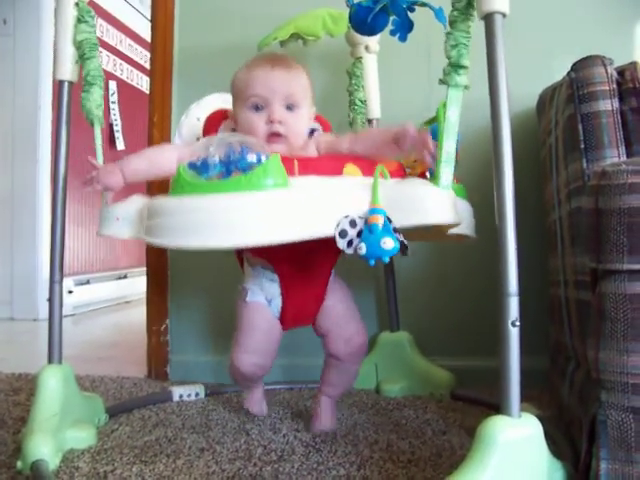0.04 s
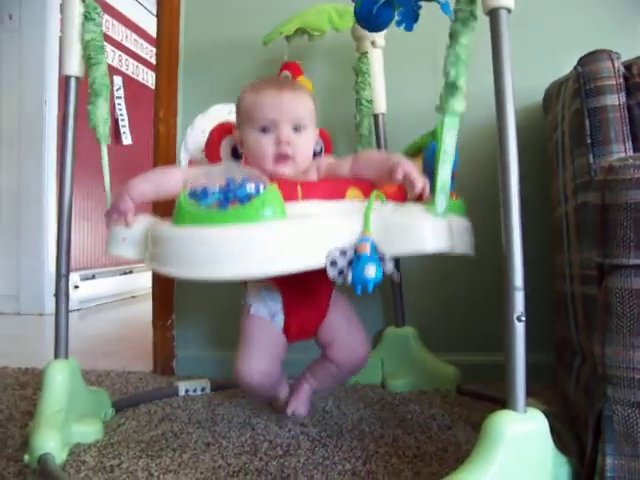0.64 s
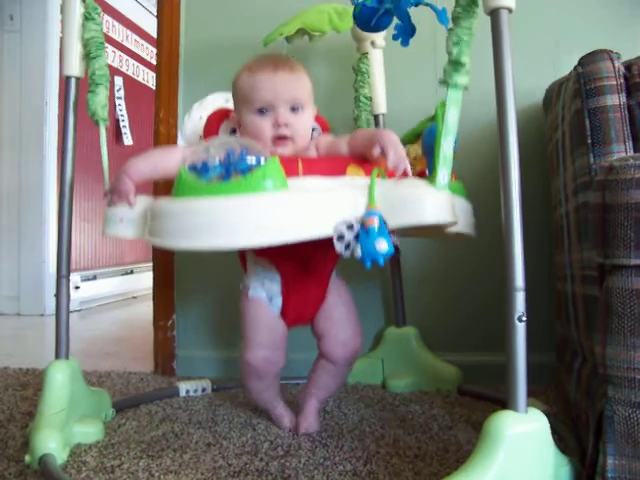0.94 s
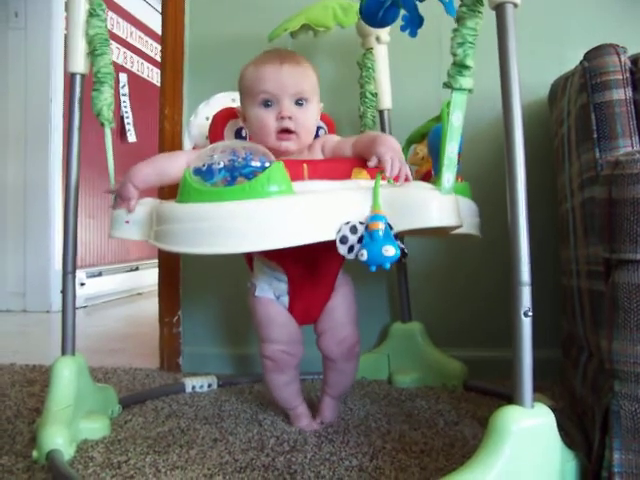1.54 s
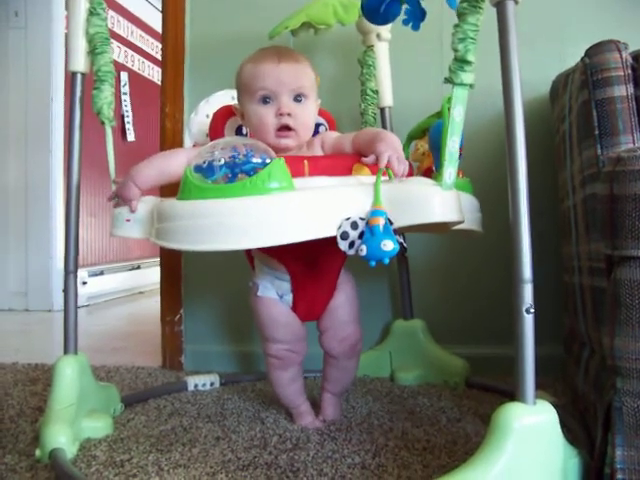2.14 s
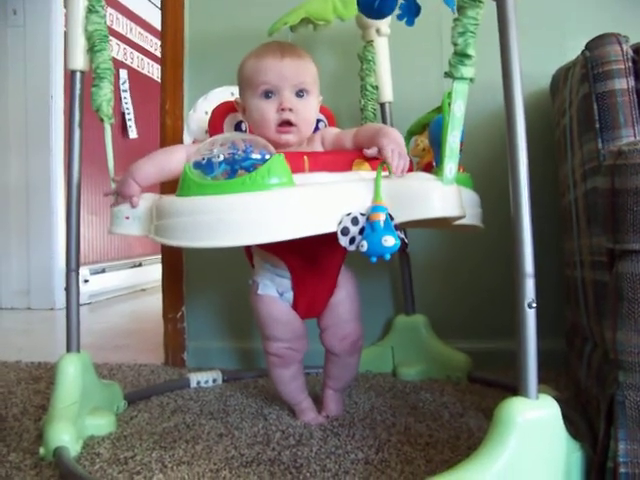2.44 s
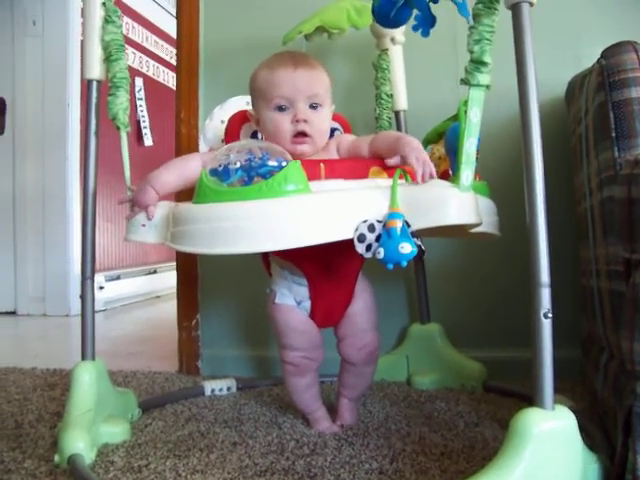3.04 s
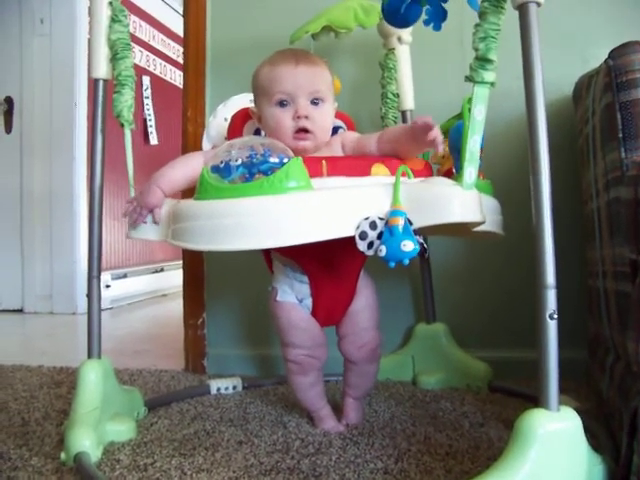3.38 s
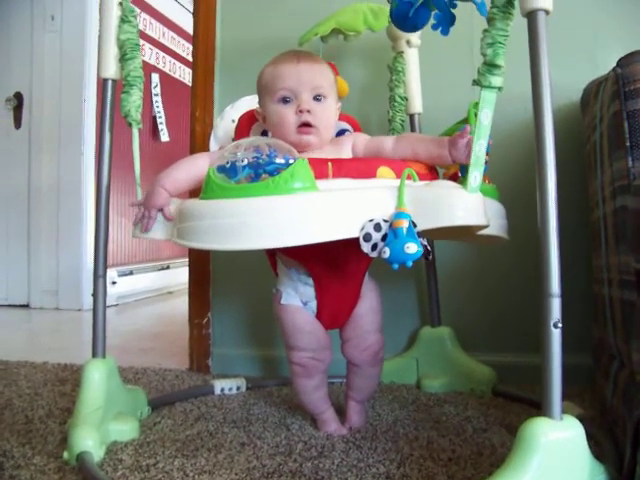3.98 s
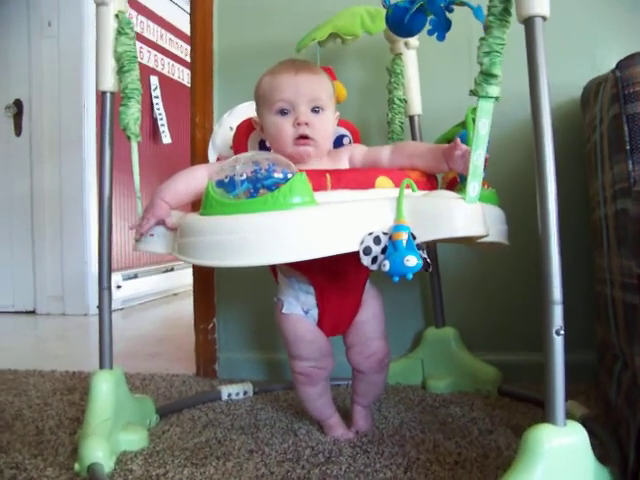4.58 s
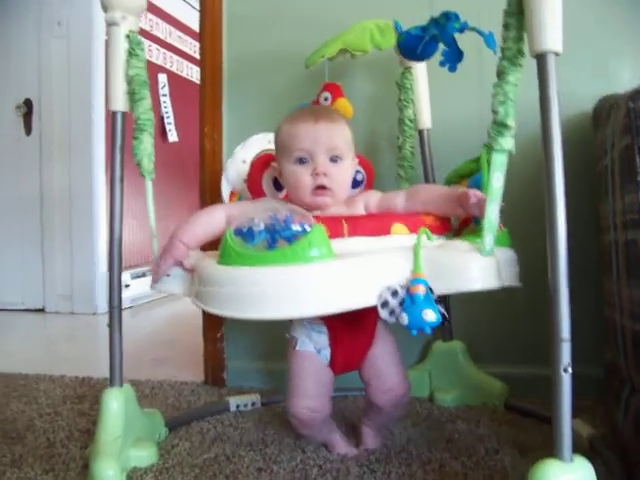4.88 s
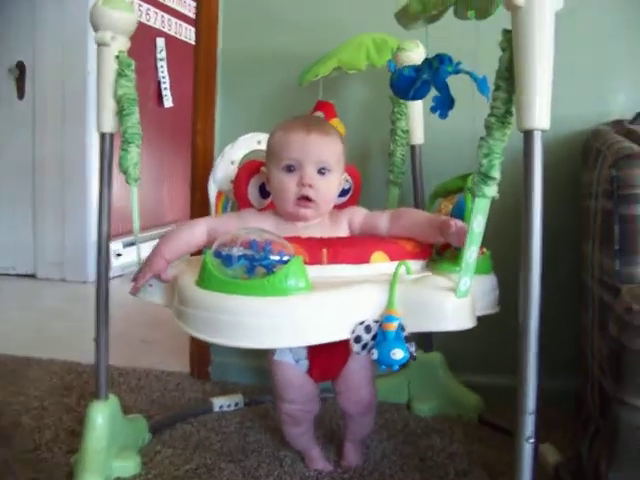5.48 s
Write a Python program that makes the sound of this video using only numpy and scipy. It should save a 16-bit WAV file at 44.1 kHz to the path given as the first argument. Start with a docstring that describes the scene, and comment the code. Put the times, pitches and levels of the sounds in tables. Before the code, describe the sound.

Close by, beads clatter in a plastic dome and toys knock and scrape on the tray of a baby jumper, with sharp snaps and low thumps. After about a second the beads only slide back and forth, ever softer. Quiet cloth rubs follow, then small creaks and a few more clacks. A faint electrical hum and hiss lie under everything in the carpeted room.

```python
"""Baby in a spring jumper

A baby bounces in a carpeted living room, rests while the tray rocks itself out, then stirs again.
Plastic beads tumble and clack in a clear dome on the tray. Hanging toys knock and scrape on the hollow
tray, the frame creaks and thuds, and the fabric seat and spring sleeves rustle.
Underneath sits a bed of mains hum and soft hiss."""
import sys
import numpy as np
from scipy import signal
from scipy.fft import rfft, irfft
from scipy.io import wavfile
from scipy.ndimage import uniform_filter1d

SR = 44100
rng = np.random.default_rng(int(sys.argv[2]) if len(sys.argv) > 2 else 0)


def generate_wav(signal):
    """Clip the signal to [-1, 1] and save it as 16-bit WAV at the path in sys.argv[1]."""
    frames = np.transpose(np.atleast_2d(signal))
    scaled = np.clip(frames, -1, 1) * 32767
    pcm = np.round(scaled).astype(np.int16)
    wavfile.write(sys.argv[1], SR, pcm)


N = 247842
TIME = np.arange(N) / SR

# the heap tumbles at a bounce, or rolls faintly as the tray rocks: t/s, length/s, level/dB
HEAP_TUMBLES = [(0, .15, -26.5), (.197, 0.0085, -20.5), (.256, 0.0077, -20.5), (.295, 0.13, -26.5),
                (.405, 0.19, -30.5), (.628, 0.086, -30.5), (.69, .048, -21.5), (.75, 0.062, -27),
                (.866, 0.14, -24.5), (.928, 0.036, -18.5), (.975, 0.047, -27), (1.115, 0.066, -27),
                (2.27, 0.039, -45), (2.765, 0.056, -54), (2.92, 0.184, -50.5), (5.45, 0.084, -36.5)]
# ring of the dome: f/Hz, t60/s, level/dB
DOME_RING = [(2340, 0.024, -27.5), (2410, 0.055, -19), (2740, 0.063, -24), (3355, 0.01, -18),
             (3700, 0.027, -32.5), (4134, 0.032, -21.5), (4810, 0.044, -26), (5050, 0.036, -22.5),
             (6714, 0.01, -18)]
# tone of the dome: f/Hz, level/dB, left minus right/dB
DOME_EQ = [(300, -41, 4), (1000, -32.5, -0.5), (1920, -33, -4), (2295, 1.5, -3), (2690, -3.5, -5.5),
           (3300, -3, 6), (4080, 2, 3), (5210, -0.5, -1.5), (6160, -5, -1), (6840, -2.5, -8),
           (7610, -11.5, -7), (7980, -30.5, -15.5), (8440, -22, 2), (8880, -46, -12)]
# the dome swings with the tray, panned at half this depth: t/s, left minus right/dB
DOME_SWING = [(0.0, -9), (0.2, 11), (0.34, -3.5), (0.6, 0), (0.77, -2.5), (1.05, 3), (1.38, 1), (2.1, 4)]
SETTLE_S, ROLL_S = 0.0022, 0.039  # time constants: the heap comes to rest, stray beads roll on


def beads():
    """Clacks and a patter of small collisions ring the dome, which is thin below its first mode."""
    hits = clacks()
    motion = linger(spells(*np.transpose(list(HEAP_TUMBLES) + slides())), SETTLE_S)
    collisions = patter(motion, rate=750, scatter_db=4.5)
    heap = shell(collisions, t60=0.011, tick=0.28, likeness=0.65, size=1024)
    strays = patter(undb(2 * -10.5) * linger(motion, ROLL_S), rate=1400, scatter_db=6.5)
    rolling = shell(strays, t60=0.0053, tick=0.32, likeness=0.78, size=1024)
    rolling = signal.sosfilt(butter(1, 4500), rolling)  # gentle contacts are duller than blows
    dome = ring(undb(-1) * hits + undb(-6.5) * heap + rolling, DOME_RING)
    # each band leaves the curved shell in its own direction
    hz, dome_db, side_db = np.transpose(DOME_EQ)
    ears = [colour(np.transpose([hz, dome_db + side * side_db / 2])) for side in (1, -1)]
    return pan(convolve(dome, ears), .5 * curve(DOME_SWING))


# a bead hits the dome and bounces: t/s, level/dB, first gap/s, loss per bounce/dB, hardness/dB
BEAD_HITS = [(.065, -16, 0.012, 10, 7), (.125, -18, .015, 1, 9), (.282, -14.5, 0.0068, 4, 10),
             (.32, -13.5, .008, 4, 11), (0.357, -16, 0.0053, 16, 6), (.367, -6.5, .002, 9, -5),
             (.403, -7, 0.018, 16, 18), (.443, -11, .018, 2.5, 13), (.689, -12, .015, 0.5, 4),
             (.794, -13.5, .013, 3.5, 4), (.97, -9, .021, 3, 15), (1.033, -5, 0.0032, 13, 8.5),
             (1.067, -11.5, 0.018, 1.5, 8.5), (1.173, -18, 0.0067, 0, 15), (1.221, -13.5, 0.012, 1.3, 0),
             (1.326, -22.5, 0.0037, 2, -6.5), (1.393, -20.5, .021, 3, -0.5), (1.49, -21, 0.0046, 3, -10),
             (1.82, -29, 0.021, 2.5, -20), (1.887, -25.5, 0.0094, 5, 1), (1.996, -26.5, 0.0067, .5, 3.5),
             (2.059, -34, .006, 12, -5), (2.147, -25, 0.0053, 14, 0), (2.315, -32.5, .004, 11, -15),
             (2.379, -29.5, 0.015, 6, 1), (2.48, -38, .009, 2, -7), (2.789, -38, .012, 2.5, -11),
             (3.3, -30.5, 0.0032, 9, 9), (5.375, -19, .003, 10, 6), (5.401, -22, 0.0086, 2.5, 1),
             (5.535, -22, 0.0036, 2, 2), (5.588, -23.5, .005, 6, -6)]
RESTITUTION = .68  # each gap between bounces as a share of the one before


def clacks():
    """Single beads bounce ever faster; hard contacts favour the treble, soft ones the low modes."""
    bounces = sorted((start + gap * np.sum(RESTITUTION ** np.arange(k)), db - k * loss_db, hardness)
                     for start, db, gap, loss_db, hardness in BEAD_HITS for k in range(5))
    times, db, hardness_db = np.transpose(bounces)
    strikes = shell(blows(times, db), t60=.015, tick=.25, likeness=.7, size=2048)
    treble_share = 1 / (1 + undb(-2 * (hardness_db + 2.5)))
    share = treble_share[np.searchsorted(times, TIME + 1 / SR) - 1]  # held from clack to clack
    lows = signal.sosfiltfilt(butter(2, 4200), strikes)
    return np.sqrt(2 * (1 - share)) * lows + np.sqrt(2 * share) * (strikes - lows)


# left alone, the tray rocks itself out on its springs: start/s, end/s, level/dB, fade/(dB per s)
TRAY_ROCKING = [(1.165, 3.2, -28, 12.5), (5.375, 5.62, -30.5, 8)]
SWING_S = .1632  # half a rocking cycle
SLIDE_S, SLIDE_SHRINK_S = 0.057, 0.85  # length of the first slide, time constant of its shortening
REBOUND_S, REBOUND_DB = 0.055, -2.5  # the heap falls back from the wall of the dome


def slides():
    """Each swing slides the heap across and back, ever shorter and softer: t/s, length/s, level/dB."""
    rows = []
    for start, end, first_db, fade_db_per_s in TRAY_ROCKING:
        for age in np.arange(0, end - start, SWING_S):
            length = SLIDE_S * np.exp(-age / SLIDE_SHRINK_S)
            db = first_db - fade_db_per_s * age
            rows += [(start + age, length, db), (start + age + REBOUND_S, length, db + REBOUND_DB)]
    return rows


# knocks on tray and frame: t/s, hollow body/dB, hard crack/dB
TRAY_KNOCKS = [(.036, -15, -19), (.088, -8, -7), (.16, -10, -16.5), (.207, -13.5, -11), (.283, -16, -26),
               (.405, -18.5, -19.5), (.522, -17, -31), (.556, -21, -19), (.748, -15, -12.5),
               (.809, -23.5, -25.5), (.896, -16, -18), (.95, -23, -26), (1.38, -35, -48), (1.524, -24, -24),
               (3.587, -32, -27.5), (5.323, -30.5, -19), (5.537, -33, -28)]
# toys drag along the tray: t/s, length/s, hollow body/dB, hard crack/dB
TOY_SCRAPES = [(0, 0.028, -27.5, -23.5), (0.038, .018, -20.5, -18.5), (.308, 0.015, -29, -31.5),
               (.492, .075, -26, -26), (0.565, 0.047, -32.5, -37), (0.851, 0.011, -24.5, -36)]
# ring of the tray: f/Hz, t60/s, level/dB
TRAY_RING = [(494, 0.063, -14.5), (529, 0.049, -15), (650, 0.018, -8), (731, 0.04, -11), (888, 0.017, -9),
             (1065, 0.019, -9.5), (1090, 0.023, -19.5), (1433, 0.016, -20.5)]
# boxy tone of the tray: f/Hz, level/dB
BODY_EQ = [(100, -22), (310, -29), (400, -17), (520, -2.5), (1100, -2), (1400, 7), (2200, 1), (3500, -18),
           (8000, -44)]
# bright attack of a hard contact: f/Hz, level/dB
CRACK_EQ = [(200, -36), (700, -18.5), (1400, 6), (2600, 6.5), (4200, 5), (5500, 4.5), (7000, -0.5),
            (8000, -23.5), (9000, -52)]
CHATTER_S, CHATTER_DB = 0.025, -7  # a toy chatters on after its knock: time constant, send level


def tray():
    """Knocks, creaks and scrapes sound the hollow tray; hard contacts add a bright crack."""
    times, body_db, crack_db = np.transpose(TRAY_KNOCKS)
    starts, lengths, rub_body_db, rub_crack_db = np.transpose(list(TOY_SCRAPES) + creaks())
    chatter = patter(1, rate=800, scatter_db=3)

    def contacts(knock_db, rub_db):
        """The blows, and the chatter that follows them or comes with a scrape."""
        hits = blows(times, knock_db)
        power = spells(starts, lengths, rub_db) + undb(2 * CHATTER_DB) * linger(hits ** 2, CHATTER_S)
        return hits + undb(-1) * chatter * np.sqrt(power)

    body = shell(undb(-6.5) * contacts(body_db, rub_body_db), t60=.036, tick=.55, likeness=.93)
    crack = shell(undb(-2) * contacts(crack_db, rub_crack_db), t60=.016, tick=.4, likeness=.5)
    hollow = convolve(ring(body, TRAY_RING), colour(BODY_EQ))
    bright = convolve(crack, colour(CRACK_EQ))
    return pan(hollow, db=-2) + pan(bright, db=0.5)


# the frame creaks under a shifting load: t/s, length/s, gap between slips/s, level/dB
FRAME_CREAKS = [(4.782, .058, 0.03, -35.5), (4.894, .045, .0165, -29), (4.947, .03, .019, -35),
                (5.021, .033, .021, -30.5), (5.216, .06, 0.0171, -31.5)]
SLIP_S, SLIP_BODY_DB = 0.0056, -7  # length of one slip, its send to the hollow body


def creaks():
    """A creak is a run of brief slips, some dull, some bright: t/s, length/s, body/dB, crack/dB."""
    slips = [(start + age, db) for start, length, gap, db in FRAME_CREAKS
             for age in np.arange(0, length, gap)]
    tilts_db = rng.uniform(-1.1, 1, len(slips))
    return [(time, SLIP_S, db + SLIP_BODY_DB + tilt, db - tilt / 2)
            for (time, db), tilt in zip(slips, tilts_db)]


# sharp snaps of a loose plastic part: t/s, level/dB
PART_SNAPS = [(0.0917, -1), (0.0958, -11.5), (0.5363, -1.5), (.5395, -0.5)]
# their biting tone: f/Hz, level/dB
SNAP_EQ = [(400, -25.5), (1800, -14.5), (2500, -3), (3200, 9), (3900, -8.5), (4400, 0), (5700, -13.5),
           (6700, -1), (8000, -25), (9000, -57)]


def snaps():
    """A small stiff part slaps against its stop."""
    slap = shell(blows(*np.transpose(PART_SNAPS)), t60=0.01, tick=0.46, likeness=0.4)
    return pan(undb(-4.5) * convolve(slap, colour(SNAP_EQ)), db=1.5)


# the rustle rides on how hard the baby works the seat: t/s, level/dB
SEAT_EFFORT = [(0, -37.5), (.9, -42.5), (1.2, -50), (2.5, -56), (4.55, -53), (4.78, -42), (5.1, -43.5),
               (5.3, -41), (5.62, -45)]
# single soft rubs: centre/s, half width/s, level/dB
FABRIC_RUBS = [(2.61, 0.048, -48.5), (3.45, 0.093, -50.5), (3.78, 0.12, -53.5), (4.12, 0.064, -48.5),
               (4.42, 0.095, -47)]
# tone of the cloth: f/Hz, level/dB
FABRIC_EQ = [(120, -17), (230, 1), (310, -15.5), (400, -0.5), (600, -0.5), (1050, 2), (1800, -0.5),
             (2800, 2.5), (4200, 0.5), (5500, -2.5), (7000, -4), (8000, -22.5), (9000, -45.5)]


def fabric():
    """Threads of the seat and the spring sleeves slip over each other."""
    rubs = sum(undb(2 * db) * np.exp(-((TIME - mid) / width) ** 2) for mid, width, db in FABRIC_RUBS)
    snags = patter(undb(2 * curve(SEAT_EFFORT)) + rubs, rate=2200, scatter_db=3)
    threads = shell(snags, t60=.018, tick=.15, likeness=.35, size=1024, count=200)
    return pan(convolve(threads, colour(FABRIC_EQ)), db=-2.5)


# low thumps at the bottom of a bounce: t/s, level/dB
FRAME_THUDS = [(0.038, -35.5), (0.202, -29.5), (0.523, -38.5)]


def thuds():
    """Dull shocks of the frame on the carpet."""
    shock = shell(blows(*np.transpose(FRAME_THUDS)), t60=0.36, tick=.05, likeness=0.94, size=16384)
    return convolve(shock, colour([(20, -11.5), (42, 15), (90, 0), (200, -5), (400, -14), (2000, -70)]))


# room tone: f/Hz, level/dB
AIR_EQ = [(15, -19.5), (25, -5.5), (140, -2), (300, -10.5), (479, 1.5), (659, 2.5), (843, 0), (953, -5.5),
          (2430, -5), (2610, -14), (2960, -11), (3510, -12.5), (3870, -15), (6180, -10), (8940, -39.5),
          (11600, -88), (19700, -120)]
# partials of the hum: f/Hz, level/dB
HUM_TONES = [(59.5, -70), (119.3, -61.5), (167, -68)]


def background():
    """Soft room air with a faint whirr, wide hiss on top and a mains hum that wavers slightly."""
    air = signal.sosfilt(butter(2, 1100), convolve(stereo_noise(0.89), colour(AIR_EQ)))
    hiss = signal.sosfilt(butter(2, 1100, "high"), convolve(stereo_noise(0.14), colour(AIR_EQ)))
    bed = pan(air, db=-1) + pan(hiss, db=-0.5)
    whirr_tone = colour([(250, -40.5), (480, -6.5), (600, 21), (720, 11), (900, -2.5), (1500, -53)])
    whirr = convolve(stereo_noise(0.95), whirr_tone)
    waver_s = 0.0024 * np.cumsum(rng.standard_normal(N)) / np.sqrt(SR)
    hum = sum(undb(db) * np.sqrt(2) * np.sin(2 * np.pi * hz * (TIME + waver_s)) for hz, db in HUM_TONES)
    return undb(-53) * bed + pan(undb(-62) * whirr + hum, db=-4)


def room(x, t60, wet_db):
    """Walls answer after some milliseconds; carpet and sofa keep the tail short."""
    arrived = TIME[:SR // 2] > .006
    tail = stereo_noise(0.92)[:, :SR // 2] * arrived * fade(t60)
    return x + undb(wet_db) * convolve(x, tail)


def shell(impacts, t60, tick, likeness, size=4096, count=24):
    """Each of `count` contact points gives a clean tick (its energy share), then a blur of modes."""
    noise = rng.standard_normal((count, 3, size))
    blur = (np.sqrt(likeness) * noise[:, :1] + np.sqrt(1 - likeness) * noise[:, 1:]) * fade(t60)[:size]
    spectra = np.sqrt(tick) + np.sqrt(1 - tick) * rfft(blur)
    # the points differ in their fine resonances, but are equally loud overall
    span = int(30 / t60 * size / SR)
    points = irfft(spectra / np.sqrt(uniform_filter1d(np.abs(spectra) ** 2, span)))
    struck = rng.integers(count, size=N)
    out = np.zeros((2, N + size))
    for i in np.flatnonzero(impacts):
        out[:, i:i + size] += impacts[i] * points[struck[i]]
    return out[:, :N]


def ring(x, modes):
    """Add the few modes that outlast the blur, in mono."""
    t = TIME[:SR // 2]
    response = sum(undb(db) * np.sqrt(2) * fade(t60) * np.sin(2 * np.pi * hz * t)
                   for hz, t60, db in modes)
    return x + convolve(x.mean(axis=0), response)


def blows(times, db):
    """One impulse per blow; its level is that of its energy spread over a millisecond."""
    out = np.zeros(N)
    samples = np.clip(np.asarray(times) * SR, 0, N - 1).astype(int)
    np.add.at(out, samples, undb(db) * np.sqrt(SR / 1000))
    return out


def patter(power, rate, scatter_db):
    """Random uneven impacts, `rate` a second, share out the power of a motion."""
    sizes = (rng.random(N) < rate / SR) * undb(scatter_db * np.clip(rng.standard_normal(N), -2, 2))
    sizes *= rng.choice([-1, 1], N)
    local_power = uniform_filter1d(sizes ** 2, size=900) + np.mean(sizes ** 2) / 10
    return sizes * np.sqrt(power / local_power)


def spells(starts, lengths, levels_db):
    """Power envelope of short spells of motion, with quick ramps at the edges."""
    return sum(undb(2 * db) * np.clip(np.minimum(TIME - start, start + length - TIME) / .0017 + .5, 0, 1)
               for start, length, db in zip(starts, lengths, levels_db))


def linger(power, seconds):
    """Let the energy of a motion die away with a time constant."""
    keep = np.exp(-1 / (SR * seconds))
    return signal.lfilter([1 - keep], [1, -keep], power + 1e-18)


def colour(points, size=4096):
    """Minimum-phase EQ response of unit energy from points of f/Hz, level/dB."""
    hz, db = np.transpose(points)
    bins = np.maximum(np.fft.rfftfreq(size, 1 / SR), 1)
    cepstrum = irfft(np.log(undb(np.interp(np.log(bins), np.log(hz), db))))
    cepstrum[1:size // 2] *= 2
    cepstrum[size // 2 + 1:] = 0
    response = irfft(np.exp(rfft(cepstrum)))
    return response / np.linalg.norm(response)


def stereo_noise(likeness):
    """White noise, from wide (likeness 0) to mono (1)."""
    centre = np.sqrt(likeness) * rng.standard_normal(N)
    return centre + np.sqrt(1 - likeness) * rng.standard_normal((2, N))


def fade(t60):
    """Exponential decay of unit energy."""
    shape = np.exp(-np.log(1000) * TIME[:SR // 2] / t60)
    return shape / np.linalg.norm(shape)


def butter(order, hz, kind="low"):
    """Sections of a smooth low- or high-pass."""
    return signal.butter(order, hz, kind, fs=SR, output="sos")


def convolve(x, response):
    """Pass a sound through a response, channel by channel."""
    return signal.fftconvolve(np.atleast_2d(x), np.atleast_2d(response), axes=1)[:, :N]


def pan(x, db):
    """Shift a sound to the left by a level difference."""
    return np.array([x[0] * undb(db / 2), x[1] * undb(-db / 2)])


def curve(rows):
    """Automation: straight lines through rows of t/s, value."""
    return np.interp(TIME, *np.transpose(rows))


def undb(db):
    """Decibels to gain; undb(2 * db) gives power."""
    return 10 ** (np.asarray(db) / 20)


def scene():
    """The jumper in its room, over dry thuds and the background bed."""
    jumper = beads() + tray() + snaps() + fabric()
    return room(jumper, t60=0.23, wet_db=-10) + thuds() + background()


TOP_HZ = 8900


def record(dry):
    """Soft-clip the loudest peaks and cut the top treble steeply."""
    rounded = 1.1 * np.tanh(dry / 1.1)
    return signal.sosfilt(signal.ellip(8, .2, 70, TOP_HZ, fs=SR, output="sos"), rounded)


dry = scene()
out = record(dry)
generate_wav(out)
```